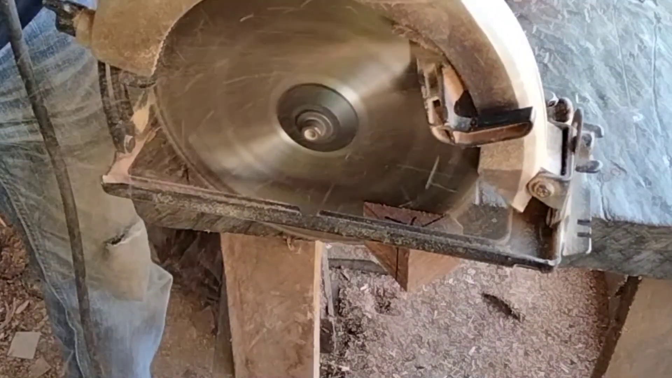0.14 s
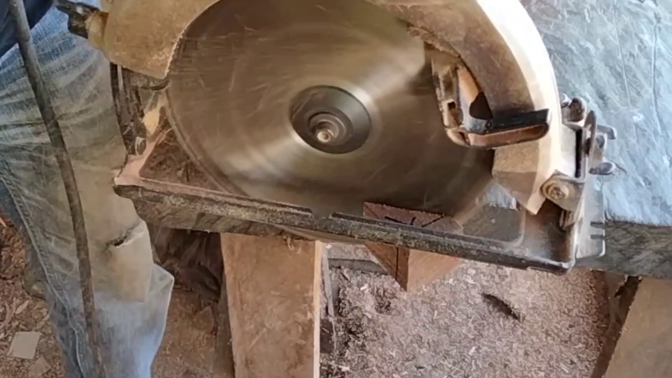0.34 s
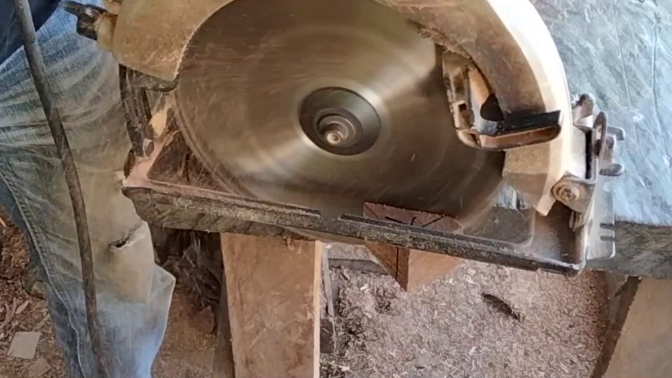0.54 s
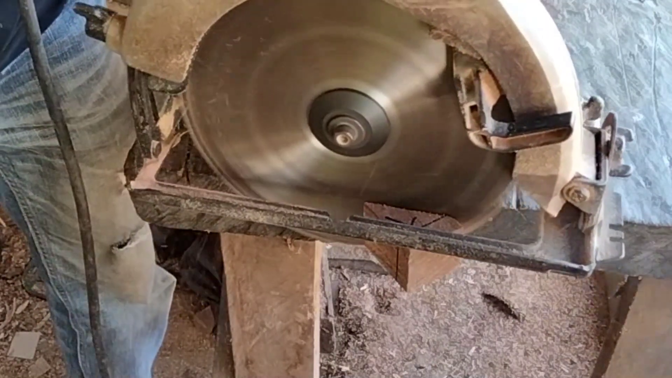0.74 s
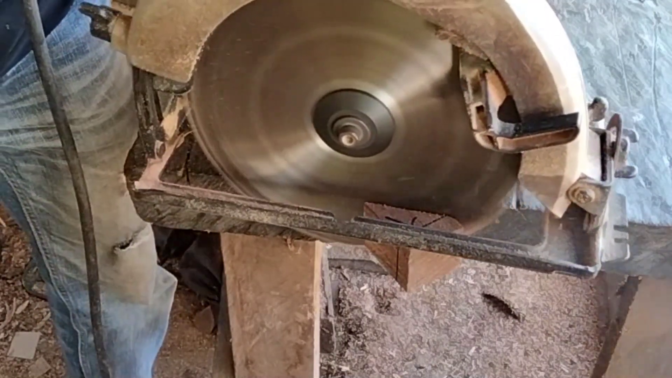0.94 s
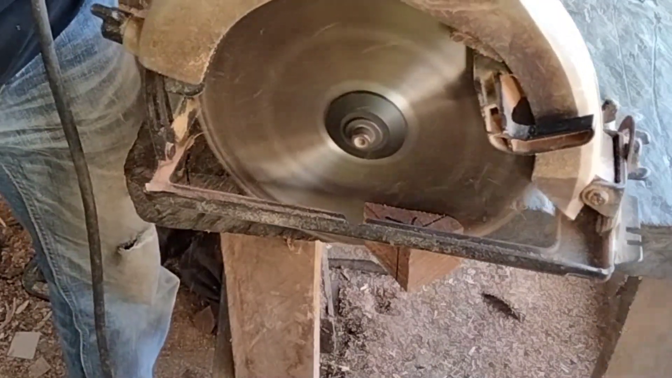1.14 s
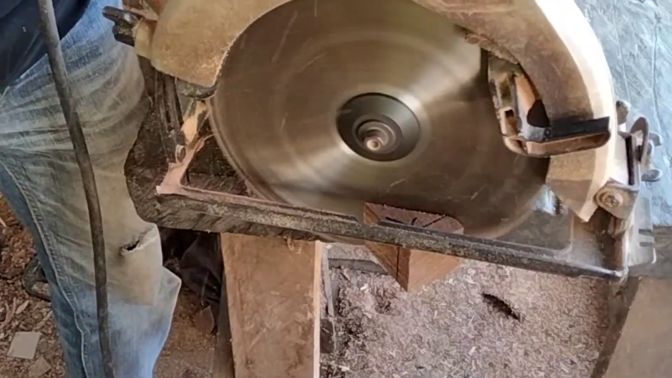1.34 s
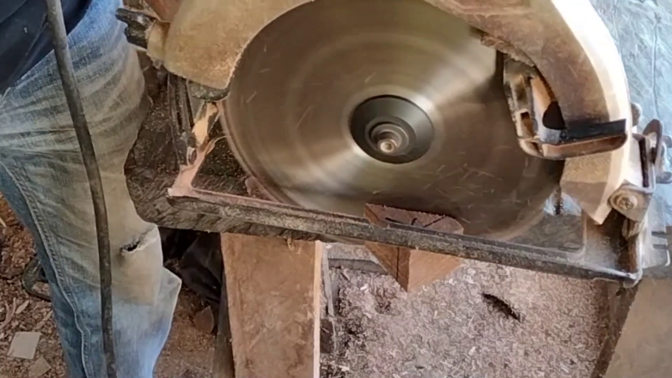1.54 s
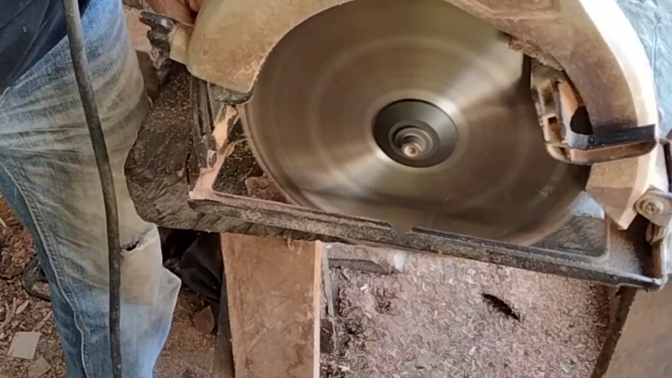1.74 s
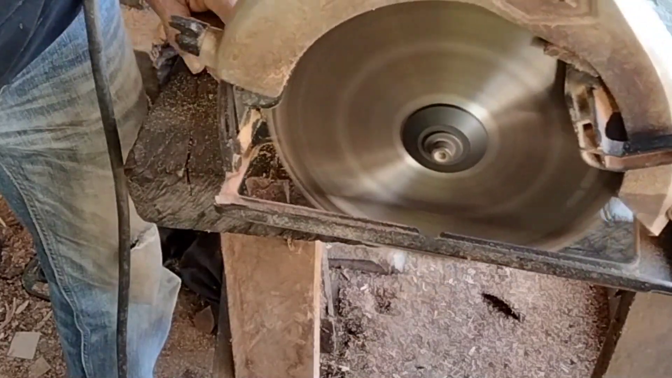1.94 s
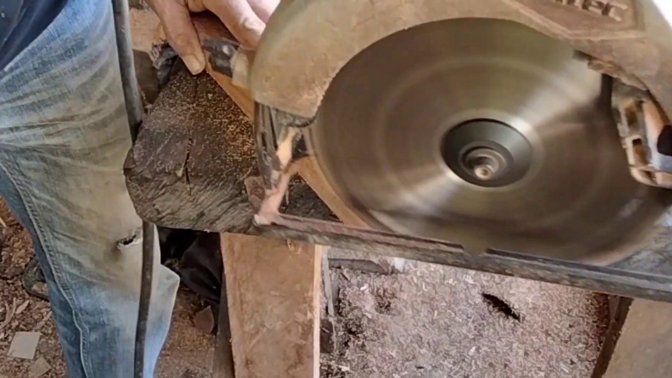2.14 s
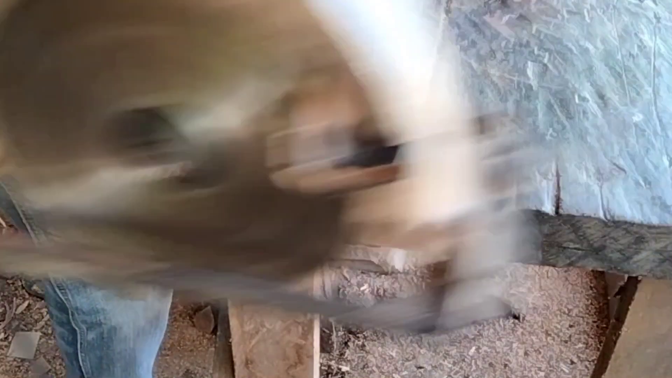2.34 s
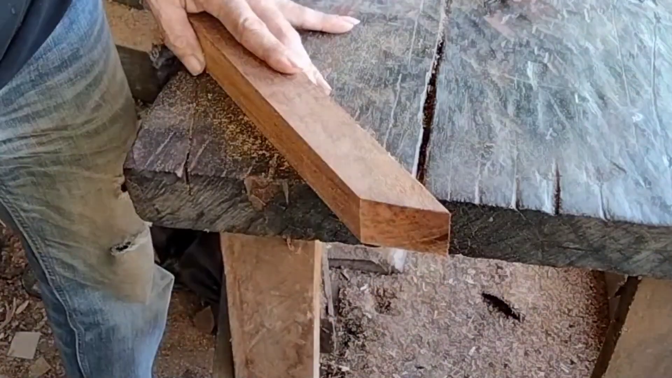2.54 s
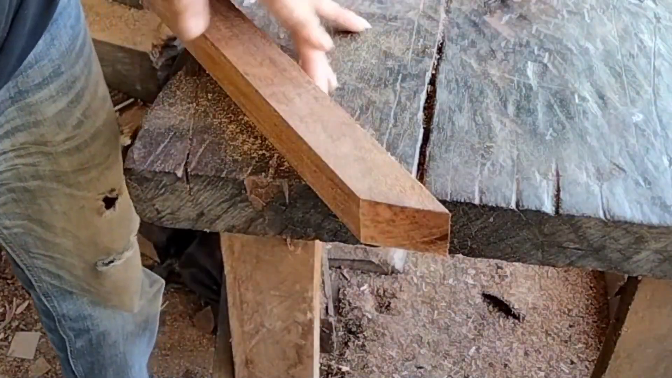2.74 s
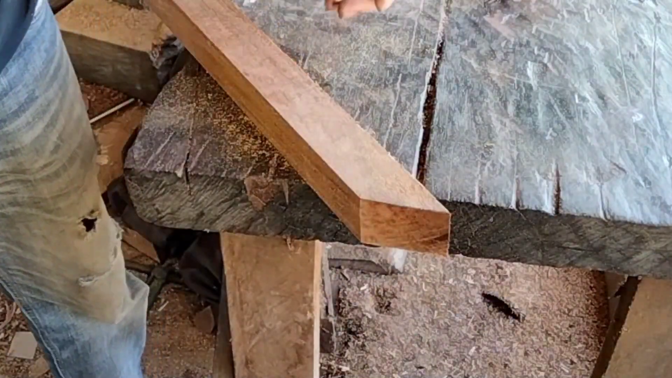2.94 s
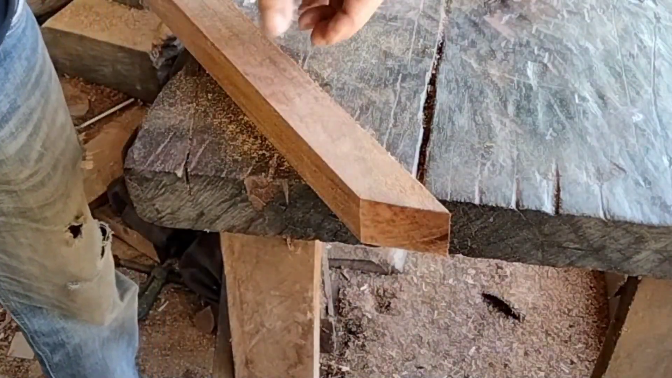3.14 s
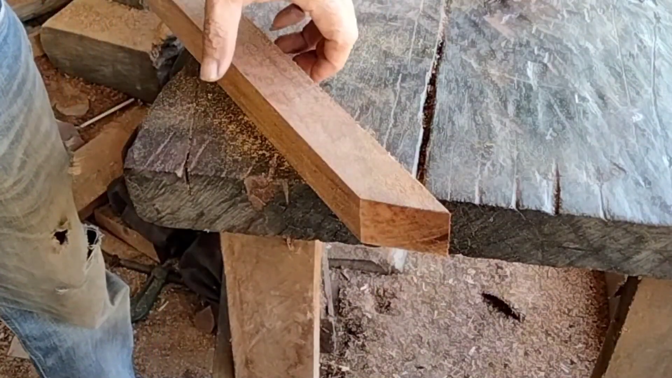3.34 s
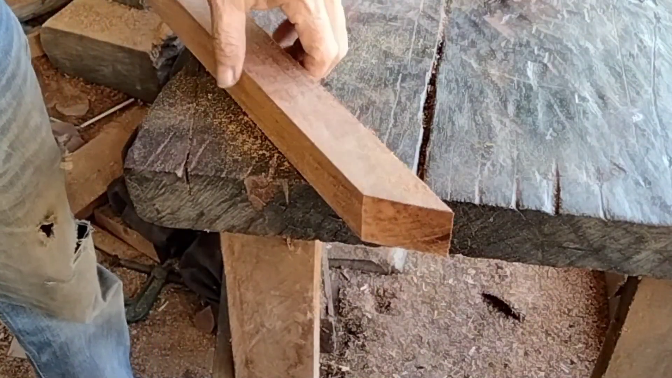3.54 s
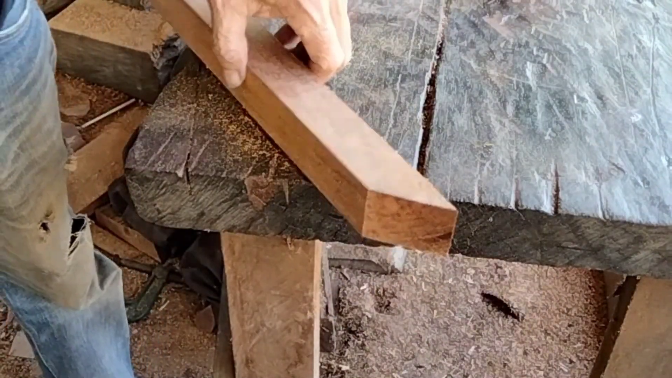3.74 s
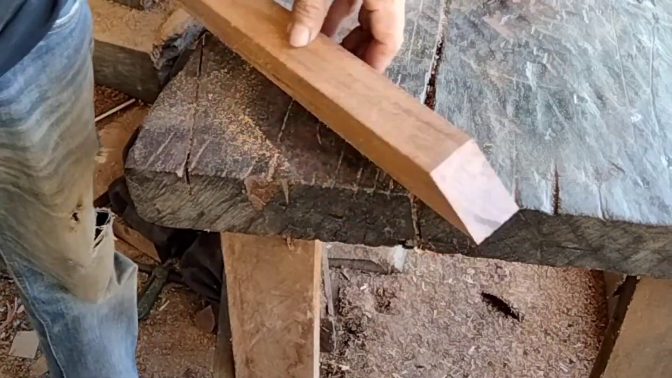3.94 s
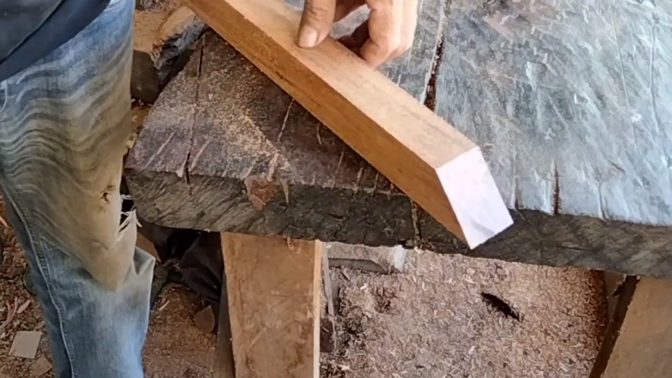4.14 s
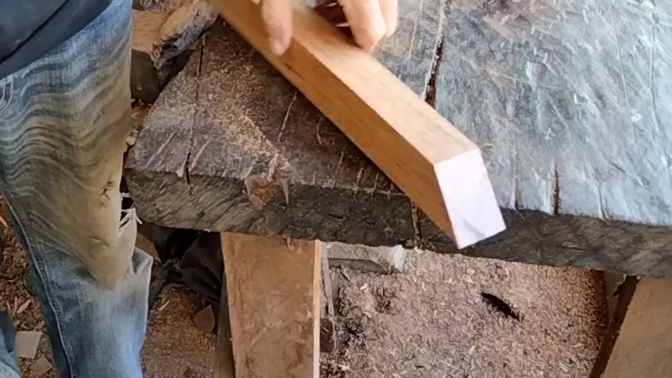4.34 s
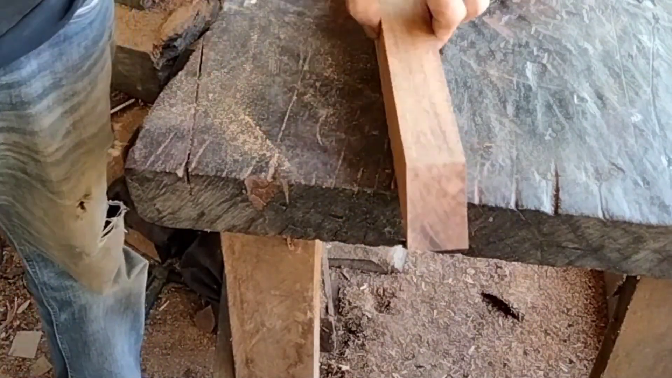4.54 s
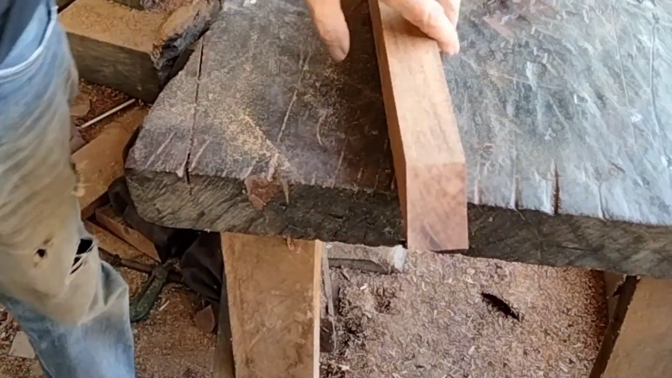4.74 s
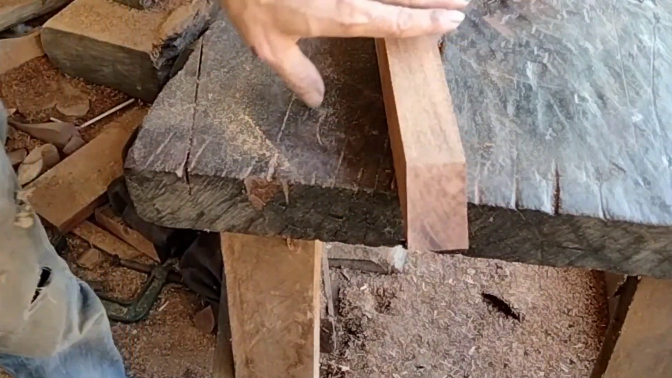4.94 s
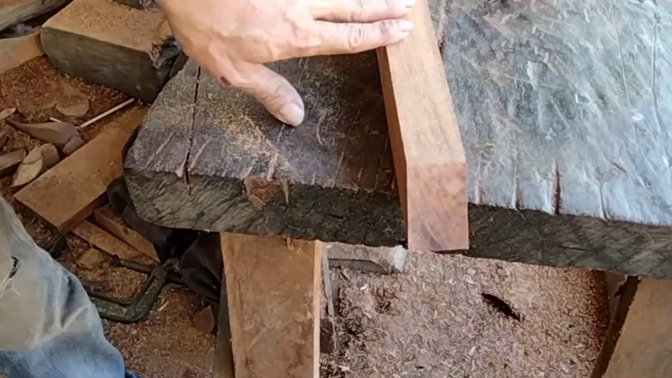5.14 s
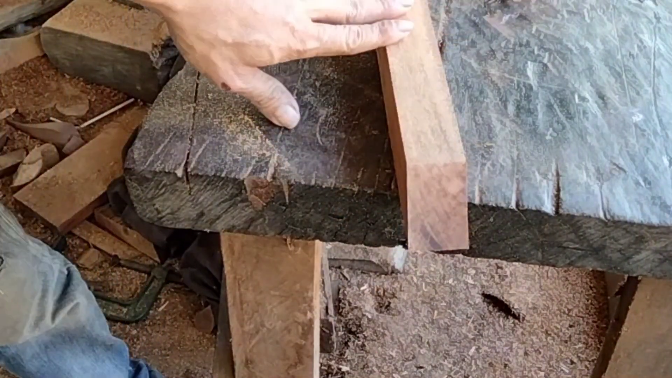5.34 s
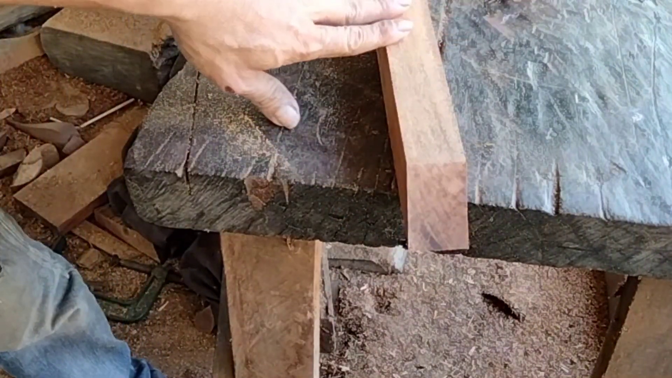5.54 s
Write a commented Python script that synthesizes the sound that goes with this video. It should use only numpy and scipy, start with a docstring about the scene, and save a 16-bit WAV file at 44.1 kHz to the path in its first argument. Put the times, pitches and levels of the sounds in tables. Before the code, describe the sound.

Close, harsh circular saw cutting a wooden bar, blade wind buffeting, then a falling motor whine and a few light knocks on a bench.

```python
"""Outdoors at a workbench, a handheld circular saw finishes a cut through a wooden bar and coasts to rest.
Saw: noise that partly repeats every turn, shaped by resonances, with tones locked to the blade speed.
Draught: pressure steps that flip up and down and leak away, until the blade has left the cut.
Knocks, thuds and the guard's snap: short pushes and noise bursts, some ringing through decaying modes.
Far birds are gliding sines with an echo tail; the quiet air is coloured noise over a low rumble."""
import sys
import numpy as np
from scipy import signal
from scipy.fft import rfft, irfft, next_fast_len
from scipy.io import wavfile
from scipy.ndimage import uniform_filter1d, map_coordinates

SR = 44100
rng = np.random.default_rng(int(sys.argv[2]) if len(sys.argv) > 2 else 0)


def inscribe(sig):
    """Save sig as 16-bit PCM at rate SR to the path in sys.argv[1].

    A 1-D sig is mono; a 2-D sig holds one channel per row.
    Samples are clipped to [-1, 1] before scaling.
    """
    pcm = np.round(np.clip(np.atleast_2d(sig).T, -1, 1) * 32767)
    wavfile.write(sys.argv[1], SR, pcm.astype(np.int16))


def rack_gain(trim_db):
    """Turn a fader trim in dB into the linear factor to multiply a signal by."""
    fader = np.asarray(trim_db, float)
    return 10 ** (fader / 20)


N = 246519
T = np.arange(N) / SR  # time of every sample, s

# spectrum of the outdoor air: pitch_hz, level_db (per Hz)
AIR_SPECTRUM = [(12, -27.5), (20, 12), (95, 1.5), (343, -29), (507, -20), (669, -32), (728, -22),
                (962, -23), (1630, -30), (5120, -40), (8690, -33.5), (15600, -49.5)]
AIR_DB = -78.5  # rms level of the quiet hiss
# far rumble over time: start_s, level_db
RUMBLE_LEVEL = [(2.0, -60.5), (4.75, -62), (4.99, -72), (5.52, -66.5), (5.59, -77.5)]
# bird whistles: start_s, length_s, first_pitch_hz, last_pitch_hz, relative level_db, pitch roughness (share of pitch)
BIRD_CALLS = [(4.198, 0.033, 4700, 4740, -63, .004), (4.975, 0.067, 2740, 3406, -66.5, 0.01),
              (4.98, .06, 2580, 2920, -79, .1), (5.493, 0.066, 5940, 5760, -83.5, .02)]
# low thuds through the bench: start_s, peak level_db, pitch_hz
BENCH_THUDS = [(1.867, -36, 156), (4.535, -51, 171), (4.612, -57, 250), (5.469, -54, 130.4)]
# spectrum of the guard snapping shut: pitch_hz, level_db (per Hz)
SNAP_SPECTRUM = [(180, -7), (300, -4), (1000, -3), (1570, -1), (1700, -9), (2890, -1), (5510, -22),
                 (8750, -3), (11000, -13), (15600, -19)]
# the guard shutting: start_s, level_db of the scatter, time_to_fall_60_db_s
SNAP_EVENT = [(4.586, -49, 0.26)]
# the bar landing on the bench: start_s, peak level_db of the tone, pitch_hz, scuff level_db against the tone
BAR_KNOCKS = [(4.11, -33, 434, -24), (4.422, -44.5, 440, -10), (4.521, -44, 1150, -10),
              (5.186, -67, 1119, -11), (5.304, -56, 1542, -1), (5.469, -47.5, 554, -5.5)]
# ways the bar vibrates: multiple of the knock's pitch, level_db, time_to_fall_60_db_s (for a 430 Hz knock)
BAR_MODES = [(1, 14, 0.062), (1.32, 9, 0.022), (2.3, 0, .04), (3.4, -10, 0.029)]
# faint bright ticks of grit: start_s, relative level_db
GRIT_TICKS = [(5.2944, -71), (5.3694, -68), (5.424, -64)]

# gusts off the blade: middle_s, half_length_s, relative level_db
BLADE_GUSTS = [(0.107, 0.11, -28), (.285, .03, -26), (0.322, 0.15, -30), (0.442, 0.012, -36),
               (0.544, 0.026, -33.5), (0.661, 0.098, -28), (.645, .03, -28), (0.785, 0.033, -34.5),
               (0.885, 0.07, -37), (0.977, 0.015, -29.5), (1.04, 0.021, -32.5), (1.153, 0.091, -31.5),
               (1.309, 0.17, -33), (1.549, 0.11, -43.5)]
# the strongest eddies, as jumps of pressure: start_s, signed relative size
EDDY_POPS = [(0.0374, 0.1), (0.0423, -0.12), (0.0447, 0.09), (0.0673, 0.09), (0.07, -0.09), (0.0862, 0.11),
             (0.1126, 0.1), (0.124, 0.1), (0.1294, 0.11), (0.1378, -0.09), (0.1566, 0.11), (0.159, -0.17),
             (0.1715, -0.12), (0.1745, 0.1), (0.2498, -0.1), (0.2571, -0.12), (0.269, 0.13), (0.2716, -0.1),
             (0.2746, -0.22), (0.278, -0.12), (0.297, 0.17), (0.3028, -0.15), (0.3196, 0.09),
             (0.3337, 0.18), (0.3469, -0.13), (0.3586, 0.09), (0.3603, -0.14), (0.3837, 0.14),
             (0.386, -0.14), (0.4154, -0.12), (0.5489, 0.1), (0.5538, -0.09), (0.5609, 0.1), (0.6087, -0.1),
             (0.6174, 0.1), (0.6195, -0.09), (0.6233, -0.12), (0.6276, 0.09), (0.6403, -0.09),
             (0.6427, 0.1), (0.6446, -0.12), (0.6489, 0.19), (0.6547, 0.09), (0.6596, -0.2), (0.6631, 0.12),
             (0.6643, -0.09), (0.6723, -0.09), (0.6837, -0.15), (0.6885, 0.13), (0.691, -0.09),
             (0.7046, 0.14), (0.7341, -0.12), (0.7485, 0.1), (1.1058, 0.1), (1.1567, -0.16),
             (1.1717, -0.09), (1.1855, -0.13), (1.2111, 0.19), (1.2445, 0.1), (1.2646, -0.13),
             (1.2998, -0.1), (1.3198, 0.13), (1.3656, 0.11), (1.4092, 0.11)]
STREAM_DB, GUST_FLICKER_DB = -47, 0.5  # steady stream on the gusts' scale; spread of the random flicker

# blade speed: start_s, turns per s
BLADE_SPEED = [(0, 67.5), (.19, 68.3), (.6, 70.6), (1.02, 72.8), (1.3, 74.2), (1.58, 75), (2.0, 60.5),
               (2.23, 53), (2.72, 39.4), (3.06, 30.9), (3.41, 23), (3.7, 17.2), (3.91, 13.0), (4.25, 6.4),
               (4.62, .5)]
SWITCH_OFF_S, REST_S = 1.58, 4.57  # from REST_S the last saw sound dies away
FULL_SPEED, STALL_SPEED = 75, 5  # blade turns per s
ARMATURE = 30 / 7  # motor turns per blade turn
# share of blade rasp against motor noise: start_s, share 0-1
RASP_SHARE = [(0, 0.38), (.5, 0.66), (1.3, 0.75), (1.55, 0.45), (1.84, 0.8), (1.9, 0.32)]
# level of the saw's hiss, which leads its other noise bands and rings: start_s, level_db
HISS_LEVEL = [(0, -24.5), (.18, -26), (.44, -26), (.64, -21.5), (.9, -23), (1.22, -25.5), (1.6, -21.5),
              (1.69, -25), (1.82, -24), (1.86, -26.5), (2.0, -24), (2.14, -28.5), (2.44, -32),
              (2.476, -38.5), (2.52, -34), (2.8, -38), (3.45, -46.5), (3.97, -55.5), (4.38, -72),
              (4.45, -71), (4.57, -69)]
# level of the top hiss against the hiss: start_s, level_db
TOP_HISS_LEVEL = [(0, -2), (.3, -2.5), (.8, -7), (1.3, -2.5), (1.55, -9), (1.72, -22), (1.84, -21),
                  (1.93, -11), (2.3, -4), (3.5, -8.5), (4.0, -17), (4.3, -16), (4.45, -6)]
# lower noise bands against the hiss, one row each: driven in wood level_db, coasting in wood level_db,
# free level_db, change_db per halving of speed, further change_db when nearly stopped
GROWL_LAW = (-15, -10, -8.5, 5.5, -21)
RASP_LAW = (-10.5, -2.5, -8.5, 2.5, -5)
# spectrum of the blade in wood: pitch_hz, level_db (per Hz)
KERF_SPECTRUM = [(350, -49.5), (600, -11), (1090, -3), (1760, -4), (2100, -2), (3040, -10), (3440, 0.5),
                 (4210, -12.5), (5390, -22), (6880, 0), (8110, -2), (10100, -5.5), (11400, -14),
                 (12400, -16), (15600, -10.5)]
# resonances of the blade in wood: pitch_hz, width_hz, boost_db
KERF_RESONANCES = [(3770, 440, 4), (7570, 74, 6), (7800, 100, 7.5), (8910, 96, 7.5), (9080, 150, 3),
                   (11350, 110, 7), (14500, 80, 3), (15200, 120, 9)]
# spectrum of motor and gears: pitch_hz, level_db (per Hz)
BODY_SPECTRUM = [(88, -50), (150, -21), (274, -12), (753, -4), (1840, 4.5), (2110, -6), (3110, -12),
                 (3360, -9.5), (4080, -10), (5570, -13.5), (6260, -17), (7050, -11.5), (7700, -0.5),
                 (8380, 7), (9410, -11), (11300, -12), (12100, -19.5), (13200, -19), (14300, -14.5),
                 (15600, -17.5)]
# resonances of motor and gears: pitch_hz, width_hz, boost_db before its random waver
BODY_RESONANCES = [(518.5, 160, 4), (1024, 20, 5.5), (1396, 138, 7), (1870, 90, 1), (2426, 16, 13),
                   (2800, 35, 9), (8500, 390, 0), (9400, 250, 3.5), (11000, 170, 8)]
# the blade jolts in its play and the noise bursts out: start_s, rise_db
BLADE_JOLTS = [(2.014, 6), (2.057, 4), (2.179, 4), (2.203, 4), (2.242, 5), (2.266, 6), (2.288, 5),
               (2.33, 6), (2.345, 5), (2.404, 5), (2.421, 4), (2.444, 7), (2.472, 13.5), (2.497, 5),
               (2.512, 3), (3.09, 4), (3.216, 5), (3.24, 4), (3.265, 4), (3.325, 3), (3.4, 4)]
JOLT_S = .008  # time constant of a jolt's decay, s
# groups of ringing modes, each a list of: pitch_hz, width_hz, level_db within the group
RING_GROUPS = [
    [(515, 50, 0)],
    [(1211, 9, 0)],
    [(2620, 30, 0)],
    [(2790, 40, 0), (2850, 40, -4)],
    [(3322, 16, -2), (3366, 18, 0), (3404, 18, -2), (3433, 18, -2), (3510, 16, -9)],
    [(4560, 25, 0), (4700, 25, 0)],
    [(5000, 40, 0), (5080, 30, -2)],
    [(6100, 90, -6), (6210, 70, -2), (6290, 60, 0), (6380, 70, -1), (6520, 90, -3)],
    [(10200, 90, 0)],
    [(13900, 380, 0)],
    [(7150, 90, 0), (7300, 60, -1)],
    [(8100, 80, -2), (8220, 60, 0), (8420, 80, -2)],
    [(6670, 40, 0)],
    [(8830, 70, 0)],
    [(14500, 300, -2), (15350, 500, 0)],
]
# steady ring of each group against the hiss: in wood level_db, free level_db, change_db per halving of speed
RING_LEVELS = [(-43.5, -41.5, 10), (-31, -28.5, 9.5), (-34.5, -24, -0.5), (-35, -26, 5), (-15, -8.5, 0.5),
               (-39.5, -34.5, -0.5), (-39.5, -36, 0.5), (-39, -7.5, 2), (-26, -9, -6), (-20, -10.5, -4),
               (-20, -30, 0.5), (-25, -7.5, -3), (-26, -34.5, 0.5), (-21.5, -20.5, -1), (-25, -11, -7.5)]
RING_WAVER_DB = 1.5  # spread of each group's random waver
# a ring group swells, mostly where a gear tone sweeps through it: middle_s, half_length_s, pitch_hz, level_db
RING_FLARES = [(1.7, 0.057, 4560, -39.5), (2.03, .05, 4560, -45), (1.62, .06, 5000, -40.5),
               (1.7, 0.043, 5000, -41), (4.271, .03, 515, -62), (4.39, .02, 515, -67),
               (.55, 0.078, 3366, -39), (3.4, 0.065, 2790, -58), (3.406, 0.094, 2790, -49.5),
               (3.65, .05, 2790, -53), (1.39, 0.088, 1211, -44.5), (1.5, 0.067, 1211, -43.5),
               (2.315, 0.0433, 1211, -48), (2.689, 0.045, 1211, -35), (3.536, 0.082, 1211, -41.5),
               (3.3, 0.032, 1211, -42), (3.888, 0.093, 1211, -45), (4.114, 0.13, 1211, -50),
               (4.273, 0.084, 1211, -64), (4.439, 0.056, 1211, -62), (4.454, 0.024, 2620, -72),
               (4.5, 0.023, 2620, -71), (0.947, 0.07, 3366, -38), (1.13, 0.2, 3366, -42.5),
               (1.35, .04, 3366, -39), (1.613, 0.07, 3366, -31), (2.1, 0.17, 3366, -37),
               (2.152, 0.074, 3366, -22), (2.362, 0.096, 3366, -23.5), (2.795, 0.033, 3366, -32),
               (1.96, 0.079, 6290, -38), (2.24, 0.065, 6290, -38), (2.1, 0.0392, 6290, -28),
               (2.521, 0.032, 6290, -39), (2.622, 0.023, 6290, -29), (3.108, 0.056, 6290, -41.5),
               (1.956, 0.047, 10200, -42), (2.111, 0.049, 10200, -27.5), (2.06, .04, 13900, -35.5),
               (2.1, .025, 13900, -33), (1.98, .015, 13900, -35), (1.65, 0.068, 6500, -30.5),
               (1.81, 0.061, 7200, -27), (1.2, 0.034, 8220, -32), (2.19, .04, 8220, -38.5),
               (2.1, 0.047, 8220, -33), (2.7, 0.051, 8220, -25.5), (1.5, 0.075, 6670, -32),
               (1.4, .1, 8830, -33.5), (1.75, .04, 8830, -33), (1.75, .12, 15000, -44)]
# tones of the teeth in wood, orders: cycles per blade turn
TOOTH_ORDER_LIST = [15, 28, 30, 38, 39, 46, 48, 50, 52, 55, 58, 62, 66, 68]
# when each of those orders sounds: start_s, end_s, level_db before its waver
TOOTH_TIMES = [(.65, 1.37, -44.5), (.75, 1.15, -44), (.42, 1.06, -40), (.8, 1.25, -42), (.42, 1.2, -45.5),
               (.64, 1.0, -35), (.66, 1.08, -39), (.52, 1.2, -40), (.55, .98, -41.5), (1, 1.21, -36.5),
               (.92, 1.12, -41), (.85, 1.3, -47), (.68, 1.4, -50), (1.0, 1.6, -50)]
# gear mesh, armature and brush tones: cycles per blade turn, relative level_db,
# speed above which it sinks (turns per s), speed below which it sinks (turns per s)
GEAR_TONES = [(30, -2, 54, 20), (60, 3, 52, 15), (90, 1.5, 62, 2), (103, 2.5, 52, 34), (120, -7, 44, 6),
              (150, -10, 45, 20)]
# brush overtones: cycles per blade turn, relative level_db
BRUSH_TONES = [(309, -3), (412, 3), (515, 3), (618, 2), (721, -3)]
# what the housing radiates of a gear tone: pitch_hz, level_db
HOUSING_RESPONSE = [(560, -30), (700, -4), (1000, 0.5), (2600, 0.5), (3400, -5), (5200, -6), (8000, -13),
                    (11000, -18)]
# housing resonances that a gear tone sweeps through: pitch_hz, width_hz, boost_db
HOUSING_RESONANCES = [(790, 200, 4), (1010, 60, 4.5), (1340, 60, 3.5), (1480, 120, 4), (1860, 110, 6),
                      (2310, 130, 3), (2950, 100, 4)]


def unit(x):
    """Scale to rms 1."""
    return x / np.sqrt(np.mean(x ** 2))


def noise():
    """White noise as long as the scene."""
    return rng.standard_normal(N)


def curve(table):
    """Join the points of a two-column table by straight lines, one value per sample."""
    s, value = np.transpose(table)
    return np.interp(T, s, value)


def colour(x, points, modes=()):
    """Filter that gives a broad spectrum with resonances and never sounds before its input."""
    size = next_fast_len(N + SR // 2)
    hz = np.maximum(np.fft.rfftfreq(size, 1 / SR), 1)
    point_hz, point_db = np.transpose(points)
    gain = rack_gain(np.interp(np.log(hz), np.log(point_hz), point_db))
    for f, width, db in modes:
        gain = gain * (1 + (rack_gain(db) - 1) / (1 + (2 * (hz - f) / width) ** 2))
    # folding the cepstrum (spectrum of the log gain) forward in time gives the minimum phase
    cepstrum = irfft(np.log(gain), size)
    cepstrum[1:size // 2] *= 2
    cepstrum[size // 2 + 1:] = 0
    return irfft(rfft(x, size) * np.exp(rfft(cepstrum)), size)[:N]


def band(x, lo_hz, hi_hz):
    """Steep band-pass."""
    return signal.sosfilt(signal.butter(4, [lo_hz, hi_hz], "bandpass", fs=SR, output="sos"), x)


def mode(x, hz, t60):
    """One resonance that falls 60 dB in t60 seconds."""
    r = np.exp(-np.log(1000) / (t60 * SR))
    w = 2 * np.pi * hz / SR
    return signal.lfilter([0, np.sin(w)], [1, -2 * r * np.cos(w), r * r], x)


def leaking(x, seconds):
    """Jumps add up to steps that leak away with a time constant in seconds."""
    return signal.lfilter([1], [1, -np.exp(-1 / (seconds * SR))], x)


def walk(rate):
    """Random levels, a new one every 1 / rate s, joined by slides; rms 1."""
    k = int(SR / rate)
    held = np.repeat(rng.standard_normal(N // k + 1), k)
    return unit(uniform_filter1d(held, k)[:N])


def swell(s, half):
    """A smooth rise and fall around a moment, silent beyond 1.494 half lengths."""
    return np.cos(np.pi / 2 * np.clip((T - s) / (1.494 * half), -1, 1)) ** 2


def repeating(turns, repeat):
    """Noise of which a share comes back every turn and slowly wears into a new pattern."""
    rows = rng.standard_normal((60, 720))  # each row is one turn; the pattern blends to the next in 12 turns
    place = [turns / 12, turns % 1 * rows.shape[1]]
    pattern = map_coordinates(rows, place, order=1, mode="grid-wrap")
    return np.sqrt(repeat) * unit(pattern) + np.sqrt(1 - repeat) * noise()


def tones(orders, turns, speed):
    """Sines locked to the rotation; play in the drive makes each waver in level and phase."""
    out = np.zeros(N)
    for k, db, *span in orders:
        hidden_db = 0
        if span:  # sinks 1.5 dB for every turn per s outside its speed range
            outside = np.maximum(speed - span[0], 0) + np.maximum(span[1] - speed, 0)
            hidden_db = -1.5 * outside
        level = rack_gain(db + hidden_db + 1.2 * walk(11) + 2.8 * walk(40))
        sine = np.sin(2 * np.pi * k * turns + .9 * walk(60))
        out += level * sine * (k * speed < 16500)
    return out


def air():
    """Quiet outdoors: coloured noise over a wavering low rumble."""
    quiet = colour(noise(), AIR_SPECTRUM)
    rumble = rack_gain(curve(RUMBLE_LEVEL) + 0.56 * walk(15)) * unit(band(quiet, 8.1, 140))
    return rumble + rack_gain(AIR_DB) * unit(band(quiet, 190, 18000))


def birds():
    """Short far whistles: sines that glide in their first half, smeared by echoes."""
    out = np.zeros(N)
    for s, length, hz0, hz1, db, rough in BIRD_CALLS:
        u = np.clip((T - s) / length, 0, 1)
        hz = hz0 + (hz1 - hz0) * np.minimum(2.0 * u, 1)
        phase = 2 * np.pi * np.cumsum(hz * (1 + rough * walk(300))) / SR
        out += rack_gain(db + 4) * np.sin(np.pi * u) * np.sin(phase)
    tail = np.arange(SR // 4) / SR
    echoes = .035 * rng.standard_normal(len(tail)) * np.exp(-tail / .03)
    return out + signal.fftconvolve(out, echoes)[:N]


def thuds():
    """Heavier contacts shake the bench: a very short push into one low mode."""
    out = np.zeros(N)
    for s, db, hz in BENCH_THUDS:
        push = np.exp(-((T - s) / 0.00047) ** 2)
        tone = mode(push, hz, 0.09)
        out += rack_gain(db) * tone / np.abs(tone).max()
    return out


def snap():
    """The sprung guard shuts: a bright tick and a short scatter off the yard."""
    (s, db, t60), = SNAP_EVENT
    t = np.maximum(T - s, 0)
    scatter = np.exp(-np.log(1000) * t / t60)
    tick = .9 * np.exp(-t / 0.004)
    burst = rack_gain(db) * unit(colour(noise(), SNAP_SPECTRUM)) * (T > s) * (scatter + tick)
    # one mode of the guard is kept faintly ringing until it is damped
    ring = unit(mode(noise(), 985, .3)) * (T > s) * np.clip((4.93 - T) / .05, 0, 1)
    return burst + rack_gain(-77 - 6 * t) * ring


def knocks():
    """The bar rocks and lands on the bench: a rough push of a few ms into its modes and a dry scuff."""
    out = np.zeros(N)
    for s, db, hz, scuff_db in BAR_KNOCKS:
        t = np.maximum(T - s, 0)
        push = noise() * (t > 0) * np.exp(-t / 0.006)
        # higher knocks die away sooner
        tone = sum(rack_gain(g) * mode(push, hz * k, t60 * (430 / hz) ** 2.0) for k, g, t60 in BAR_MODES)
        scuff = band(noise(), 340, 2300) * (t > 0) * (np.exp(-t / 0.02) + np.exp(-t / 0.003))
        out += rack_gain(db) * (tone / np.abs(tone).max() + rack_gain(scuff_db) * scuff)
    return out


def ticks():
    """Grit ticks faintly: bright noise that starts at once and dies away in some ms."""
    out = np.zeros(N)
    for s, db in GRIT_TICKS:
        out += rack_gain(db - 2.0) * band(noise(), 5800, 12000) * (T > s) * np.exp(-np.abs(T - s) / 0.0083)
    return out


def draught():
    """Eddies flip the pressure at the microphone in steps that leak away; strong gusts flip it faster."""
    stream = rack_gain(STREAM_DB) * np.clip((1.9 - T) / 0.28, .2, 1)  # weakens as the blade leaves the cut
    gusts = sum(rack_gain(g) * swell(s, half) for s, half, g in BLADE_GUSTS)
    db = 20 * np.log10(stream + gusts) + GUST_FLICKER_DB * walk(25)
    rate = 330 * rack_gain(db + 22.0) ** 0.54 + 40  # flips per s
    flips = np.cumsum(rng.random(N) < rate / SR)
    state = (-1) ** flips * rack_gain(2.1 * noise())[flips]
    kicks = np.diff(state, prepend=state[0])
    steps = unit(leaking(kicks, 0.013) + 0.24 * leaking(kicks, 0.0012))
    small = unit(steps + 0.95 * unit(band(noise(), 4.3, 71)))
    jumps = np.zeros(N)
    for s, size in EDDY_POPS:
        jumps[int(s * SR)] = size
    pops = leaking(jumps, 0.013) + 0.55 * leaking(jumps, 0.0012)
    ending = np.clip((2.05 - T) / .1, 0, 1)
    pressure = rack_gain(db + 1.13) * ending * small + pops
    return colour(pressure, [(8, -14), (35, -2), (120, -2.0), (350, -1.5), (900, -1), (3000, 1.5)])


def motor_noise(rattle, speed):
    """Rattle of motor and gears through the housing, whose resonances come and go."""
    plain = colour(rattle, BODY_SPECTRUM)
    body = plain.copy()
    for resonance in BODY_RESONANCES:  # each is caught and lost as the load shifts
        body += rack_gain(3 * walk(6)) * (colour(rattle, BODY_SPECTRUM, [resonance]) - plain)
    # slower knocking sounds darker
    return body + 1.4 * np.clip(1 - speed / 35, 0, 1) ** 1.5 * band(body, 430, 1500)


def rings(shake, judder, hiss, wood, halvings, stalling):
    """Narrow modes of blade and housing ring as the noise shakes them, and flare up at listed moments."""
    out = np.zeros(N)
    for (in_wood, free, per_halving), group in zip(RING_LEVELS, RING_GROUPS):
        lowest, highest = group[0][0], group[-1][0]
        law = wood * in_wood + (1 - wood) * (free + per_halving * halvings - 22 * stalling)
        gain = rack_gain(1.6 * judder + hiss + law + RING_WAVER_DB * walk(12))
        for s, half, hz, db in RING_FLARES:
            if lowest <= hz <= highest:
                gain += rack_gain(db) * swell(s, half)
        ring = sum(rack_gain(g + walk(6.8)) * unit(mode(shake, hz, 1.9 / width)) for hz, width, g in group)
        ring = unit(band(ring, .985 * lowest, 1.015 * highest))
        # even out the ring's own swelling in part
        evened = ring / (uniform_filter1d(ring ** 2, SR // 30) + .1) ** .3
        out += gain * unit(evened)
    return out


def tooth_tones(turns):
    """Teeth biting the wood sing at whole multiples of the blade's rotation."""
    out = np.zeros(N)
    for order, (t0, t1, db) in zip(TOOTH_ORDER_LIST, TOOTH_TIMES):
        fade = np.clip(np.minimum(T - t0, t1 - T) / .08, 0, 1)
        out += rack_gain(db + 1.8 * walk(14)) * fade * np.sin(2 * np.pi * order * turns + .4 * walk(30))
    return out


def saw():
    """Rasp in the kerf gives way to motor noise; both shake blade and housing; tones follow the blade speed."""
    speed, rasp_share = curve(BLADE_SPEED), np.clip(curve(RASP_SHARE), 0, 1)
    motor_share = 1 - rasp_share
    hiss, top = curve(HISS_LEVEL), curve(TOP_HISS_LEVEL)
    turns = np.cumsum(speed) / SR
    # every tooth has its own set and edge; flaws of the armature pass the brushes once a motor turn
    rasp = repeating(turns, .6)
    rattle = repeating(ARMATURE * turns, .3)
    kerf = colour(rasp, KERF_SPECTRUM, KERF_RESONANCES)
    body = motor_noise(rattle, speed)
    judder = 0.14 * walk(45) + 0.53 * walk(80) + 0.99 * walk(120)  # backlash makes the load uneven, dB
    judder += sum(db * (T > s) * np.exp(-np.abs(T - s) / JOLT_S) for s, db in BLADE_JOLTS)

    halvings = np.log2(FULL_SPEED / np.maximum(speed, STALL_SPEED))
    coasting = np.clip((T - SWITCH_OFF_S) / 0.13, 0, 1)
    stalling = np.clip(1 - speed / STALL_SPEED, 0, 1)
    wood = np.clip((1.9 - T) / 0.065, 0, 1)  # falls to 0 as the blade leaves the cut
    lower = []
    for driven, coasted, free, per_halving, stalled in (GROWL_LAW, RASP_LAW):
        in_wood = driven + coasting * (coasted - driven)
        in_air = free + per_halving * halvings + stalled * stalling
        lower.append(hiss + wood * in_wood + (1 - wood) * in_air)
    growl_db, rasp_db = lower
    top_db = hiss + top

    out = np.zeros(N)
    bands = ((growl_db, 100, 3390), (rasp_db, 2600, 5700), (hiss, 5700, 11800), (top_db, 11800, 19000))
    for db, lo, hi in bands:
        blade_part = np.sqrt(rasp_share) * unit(band(kerf, lo, hi))
        motor_part = np.sqrt(motor_share) * unit(band(body, lo, hi))
        out += rack_gain(db + judder + 1.1 * walk(35)) * (blade_part + motor_part)
    shake = np.sqrt(rasp_share) * rasp + np.sqrt(motor_share) * rattle
    out += rings(shake, judder, hiss, wood, halvings, stalling)
    out += tooth_tones(turns)
    # a gear tone swells when it crosses a housing resonance,
    # and stands out more against the growl as the blade slows
    gears = colour(tones(GEAR_TONES, turns, speed), HOUSING_RESPONSE, HOUSING_RESONANCES)
    out += rack_gain(growl_db + 1.2 - speed / 16) * motor_share * gears
    brushes = band(tones(BRUSH_TONES, turns, speed), 11500, 17000)
    out += rack_gain(top_db - 6.5) * motor_share * brushes
    return out * np.exp(-np.maximum(T - REST_S, 0) / 0.031)


def scene():
    """All sources at one microphone."""
    return (air() + birds() + thuds() + snap() + knocks() + ticks() + draught() + saw())[None]


def band_limit(x):
    """A steep low-pass at the top of the band."""
    return signal.sosfilt(signal.butter(12, 16890, fs=SR, output="sos"), x)


def record(dry):
    """The recorder cuts the treble steeply above 15760 Hz."""
    low_pass = signal.ellip(10, .2, 70, 15760, fs=SR, output="sos")
    cut = signal.sosfilt(low_pass, dry)
    return band_limit(cut)


dry = scene()
out = record(dry)
inscribe(out)
```